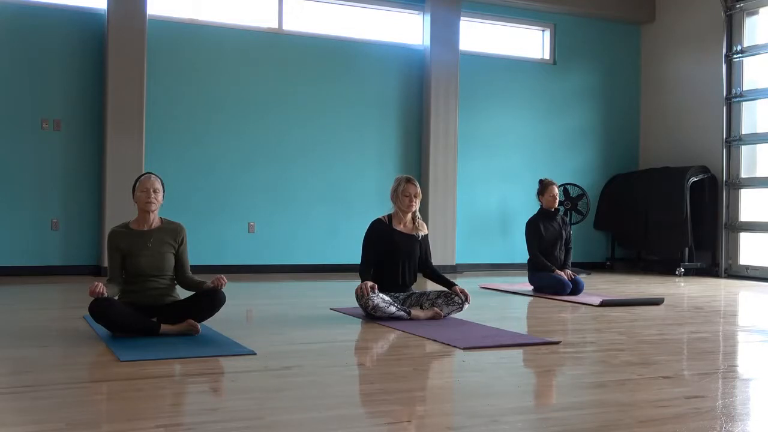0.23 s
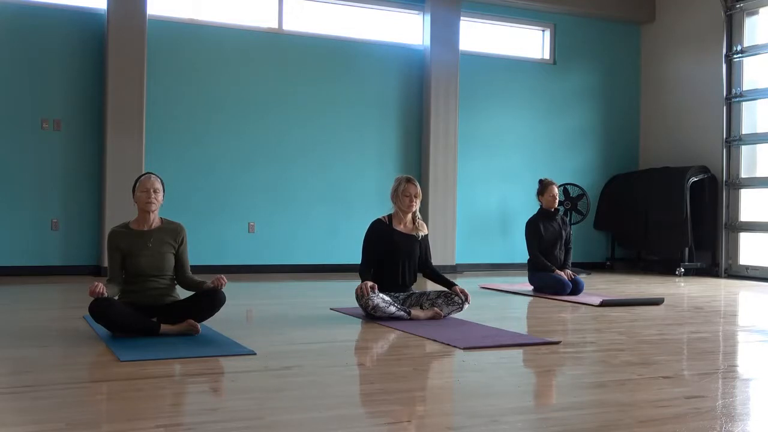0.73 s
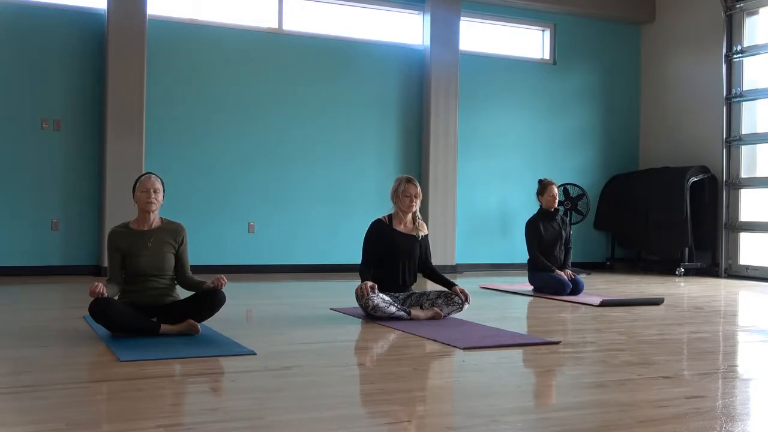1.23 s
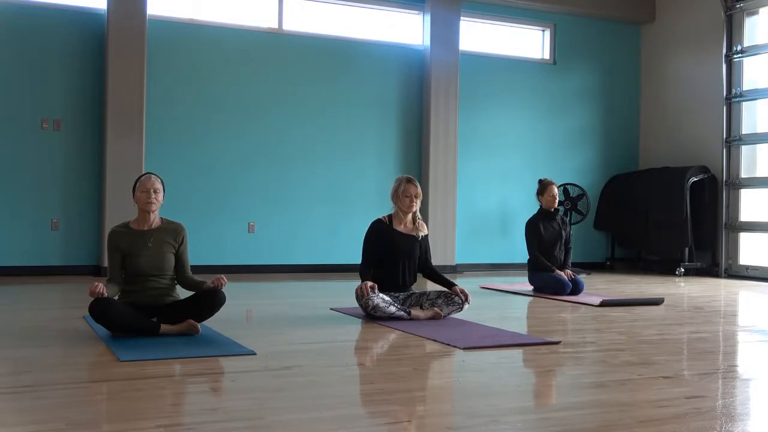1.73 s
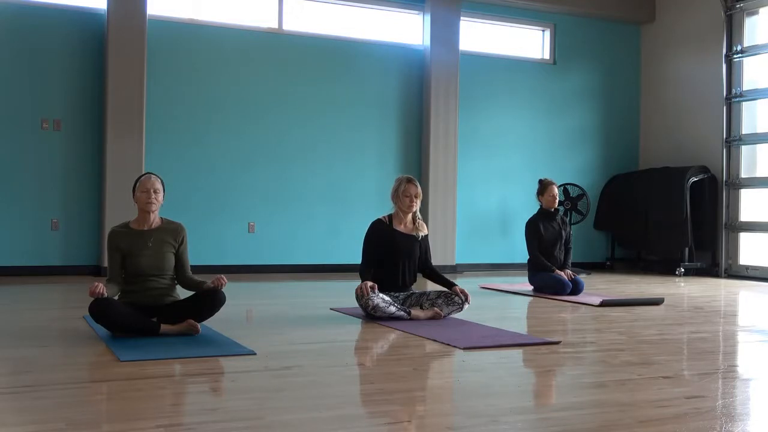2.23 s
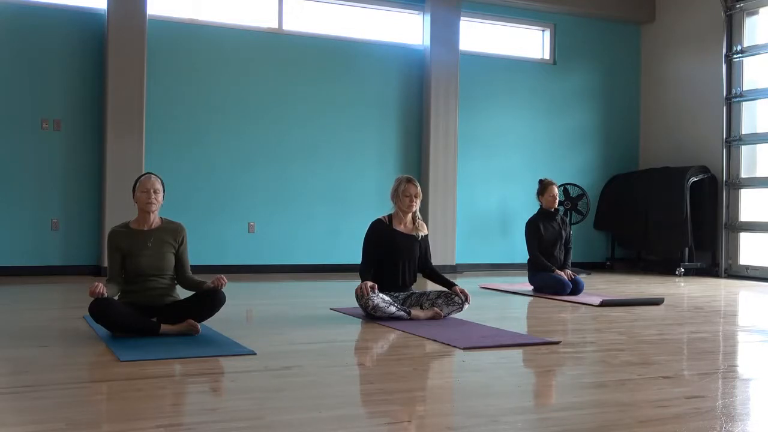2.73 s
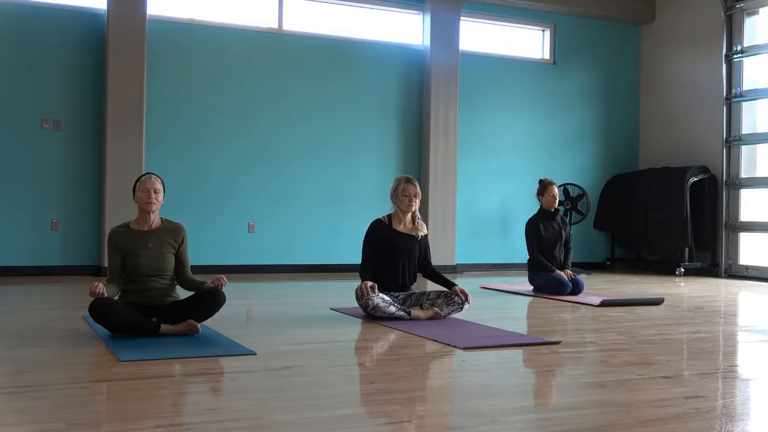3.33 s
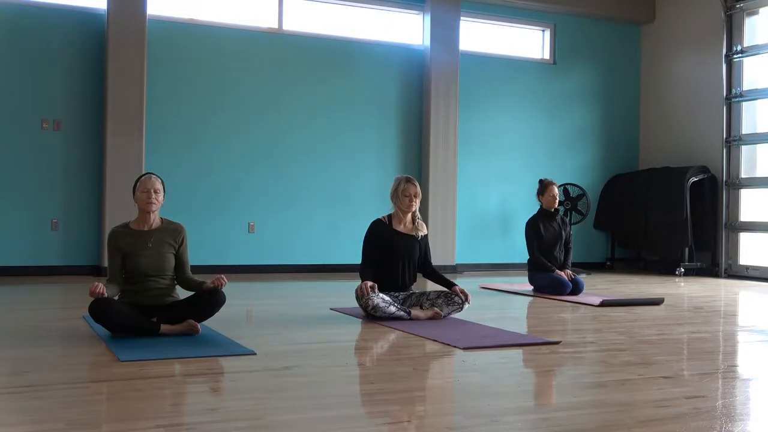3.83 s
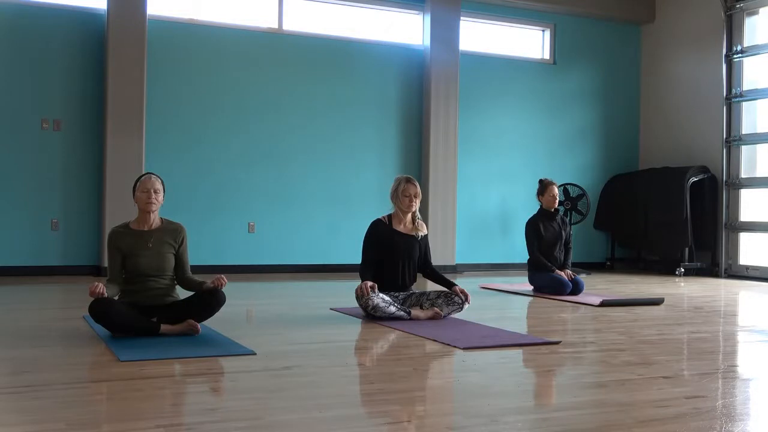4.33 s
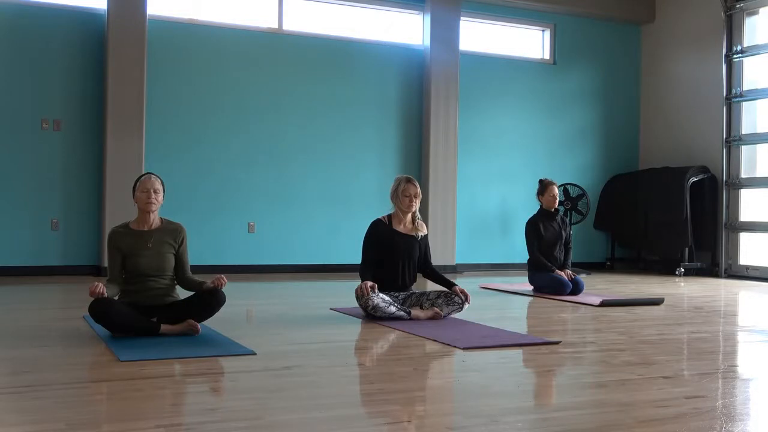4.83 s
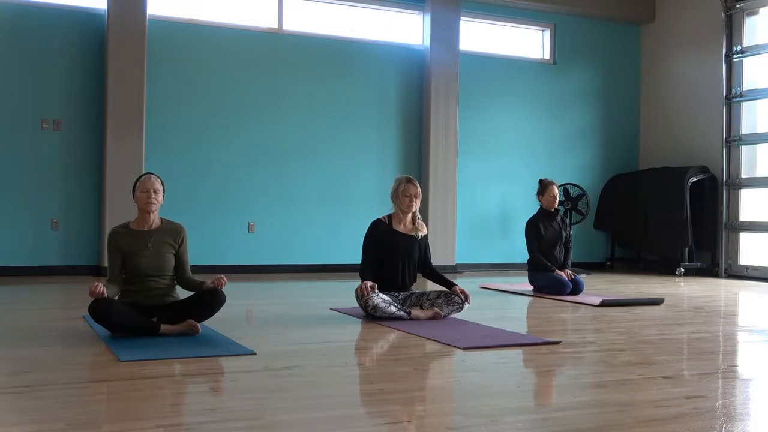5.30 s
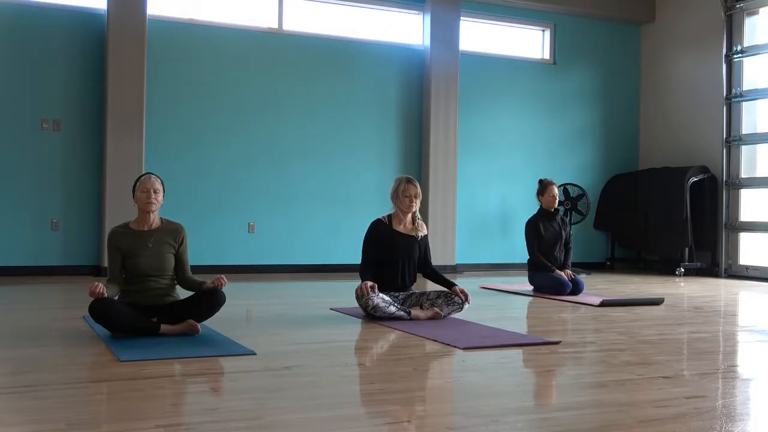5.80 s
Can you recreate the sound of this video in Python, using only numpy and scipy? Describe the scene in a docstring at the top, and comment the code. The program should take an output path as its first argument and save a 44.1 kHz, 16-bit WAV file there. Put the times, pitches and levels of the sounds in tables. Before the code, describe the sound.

Constant room tone from start to end: broad microphone hiss spread left and right, air-handling rumble near the centre, and a faint steady electrical hum. The airy part of the rumble rises slightly, then one soft, breath-like puff of dull noise swells quickly and dies away with a dark tail in the hall. Afterwards only hiss, rumble and hum remain.

```python
"""A large quiet hall heard through stereo microphones with their gain turned far up.
From the start there is wide flickering noise from each channel, a surging ventilation rumble built from
shaped noise, and a mains hum of two sines. From 1.0 s the airy top of the rumble grows a little.
At 2.44 s a short muffled rush of dull noise swells, then fades with its lows lingering;
from 2.8 s the airy top sinks back, and the room tone carries on to the end."""
import sys
import numpy as np
from scipy import signal
from scipy.fft import rfft, irfft, next_fast_len
from scipy.io import wavfile
from scipy.ndimage import uniform_filter1d

SR = 44100
rng = np.random.default_rng(int(sys.argv[2]) if len(sys.argv) > 2 else 0)


def wrap_up_sound(samples):
    """Save the sound to the file named by the first command line argument, as 16-bit audio."""
    columns = np.atleast_2d(samples).T
    # keep every value between -1 and 1, then stretch to whole-number steps
    tamed = np.clip(columns, -1, 1)
    steps = np.round(tamed * 32767).astype(np.int16)
    wavfile.write(sys.argv[1], SR, steps)


N = 267246

# colour of the rush, relative spectral density: f/Hz, level/dB
RUSH_COLOUR = [(150, -25), (300, 0), (450, -5), (590, -1), (800, -10), (1050, -7), (1600, -12), (2400, -13),
               (3500, -17), (4500, -25), (8000, -45)]
# colour of one microphone channel's self-noise, relative spectral density: f/Hz, level/dB
HISS_COLOUR = [(12, -32), (20, -6.5), (109, -1), (324, -9.5), (505, -9), (581, -10.5), (834, -11.5),
               (1450, -13.5), (7110, -17.5), (15500, -19.5)]
# colour of the air-handling rumble, relative spectral density: f/Hz, level/dB
RUMBLE_COLOUR = [(5, -28), (12, -21), (19, -0.5), (26, -3), (36, 1.5), (48, -4.5), (65, -5), (105, -6.5),
                 (140, -11.5), (180, -17), (300, -24), (500, -31), (1000, -37), (3000, -45), (8000, -87)]
# swell of the airy upper part of the rumble against its lows: t/s, level/dB
AIRY_SWELL = [(0, 0), (1.0, 0), (1.6, 2), (2.8, 2), (3.4, 0.5), (6.06, -0.5)]
# mains hum lines, rms level before the waver: f/Hz, level/dB
HUM_LINES = [(120, -29), (240.1, -33.5)]

# gains on noise of rms 1; the rush's is for its centred part, before the lift of the highs
RUSH_DB, HISS_DB, RUMBLE_DB = -26.5, -23.5, -15.5
RUSH_START_S, RUSH_ATTACK_S, RUSH_SPLIT_HZ = 2.44, .055, 1500
RUSH_LOWS_HOLD_S, RUSH_LOWS_T60_S = .125, .9  # T60: time to fall 60 dB
RUSH_HIGHS_HOLD_S, RUSH_HIGHS_T60_S, RUSH_HIGHS_LIFT_DB = .12, .5, 1.5
TOP_HZ = 15720


def undb(db):
    """Decibels to gain."""
    return 10 ** (np.asarray(db) / 20)


def curve(rows):
    """A (t/s, value) table read at every sample."""
    return np.interp(np.arange(N) / SR, *np.transpose(rows))


def walk(rate):
    """Random levels, rate new ones per second, smoothed twice into a wandering line; spread about 0.7."""
    hold = int(SR / rate)
    steps = np.repeat(rng.standard_normal(N // hold + 1), hold)
    return 0.98 * uniform_filter1d(uniform_filter1d(steps, hold), hold)[:N]


def noise(colour, channels=1, lo_hz=0, hi_hz=SR):
    """A band of coloured noise with octave-wide edges; the colour's whole spectrum would have rms 1."""
    size = next_fast_len(N)
    octave = np.log2(np.fft.rfftfreq(size, 1 / SR) + 1e-3)
    hz, db = np.transpose(colour)
    gain = undb(np.interp(octave, np.log2(hz), db))
    gain = gain / np.sqrt(np.mean(gain ** 2))
    # sine and cosine edges let neighbouring bands add up in power
    rise = np.clip(octave - np.log2(lo_hz + 1e-9) + .5, 0, 1)
    fall = np.clip(octave - np.log2(hi_hz) + .5, 0, 1)
    gain = gain * np.sin(np.pi / 2 * rise) * np.cos(np.pi / 2 * fall)
    white = rng.standard_normal((channels, size))
    return irfft(rfft(white) * gain, size)[:, :N]


def rush_fade(hold_s, t60_s):
    """Full level through attack and hold, then an exponential decay."""
    since_hold = np.arange(N) / SR - RUSH_START_S - RUSH_ATTACK_S - hold_s
    return undb(-60 * np.maximum(since_hold, 0) / t60_s)


def rush(diffuse_db=-9):
    """A short centred swell of dull noise, with a share scattered by the walls; the lows linger."""
    rise = np.clip((np.arange(N) / SR - RUSH_START_S) / RUSH_ATTACK_S, 0, 1)
    lows = noise(RUSH_COLOUR, channels=2, hi_hz=RUSH_SPLIT_HZ)
    lows = rush_fade(RUSH_LOWS_HOLD_S, RUSH_LOWS_T60_S) * lows
    highs = noise(RUSH_COLOUR, channels=2, lo_hz=RUSH_SPLIT_HZ)
    highs = undb(RUSH_HIGHS_LIFT_DB) * rush_fade(RUSH_HIGHS_HOLD_S, RUSH_HIGHS_T60_S) * highs
    centre, scatter = lows + highs
    # the scattered share has opposite signs left and right
    sides = undb(diffuse_db) * scatter * np.array([[1], [-1]])
    return undb(RUSH_DB) * rise * (centre + sides)


def hiss(shared_db=.5, own_db=.5, opposed=0.08):
    """Microphone self-noise, nearly unrelated left and right; its bands flicker partly together."""
    edges_hz = [0, 700, 1400, 2800, 5600, 11200, SR]
    shared = shared_db * walk(18)
    bands = []
    for lo, hi in zip(edges_hz, edges_hz[1:]):
        flicker = undb(shared + own_db * walk(18))
        bands.append(flicker * noise(HISS_COLOUR, channels=2, lo_hz=lo, hi_hz=hi))
    # the top band is slightly out of phase between the sides
    bands[-1] = bands[-1] - opposed * bands[-1][::-1]
    return undb(HISS_DB) * sum(bands)


def rumble(gust_db=1.2, surge_db=1.33):
    """Duct turbulence: surging lows and an airy top in small gusts, reaching the right microphone first."""
    low = undb(surge_db * walk(8)) * noise(RUMBLE_COLOUR, hi_hz=253)
    high = undb(curve(AIRY_SWELL) + gust_db * walk(6)) * noise(RUMBLE_COLOUR, lo_hz=248)
    air = (undb(RUMBLE_DB) * (low + high))[0]
    return np.array([np.roll(air, 2), air])  # left is two samples late


def hum(waver_db=0.5):
    """Sines near two and four times the line frequency, each wavering slightly in strength."""
    t = np.arange(N) / SR
    total = np.zeros(N)
    for hz, db in HUM_LINES:
        peak = np.sqrt(2) * undb(db + waver_db * walk(3))
        total += peak * np.sin(2 * np.pi * (hz * t + rng.random()))
    return total


def scene():
    """The rush and hum centred, the rumble just off centre, the hiss wide."""
    return rush() + hiss() + rumble() + hum()


def record(dry):
    """The recorder cuts the top steeply."""
    lowpass = signal.ellip(14, .2, 90, TOP_HZ, fs=SR, output="sos")
    return signal.sosfilt(lowpass, dry)


dry = scene()
out = record(dry)
wrap_up_sound(out)
```